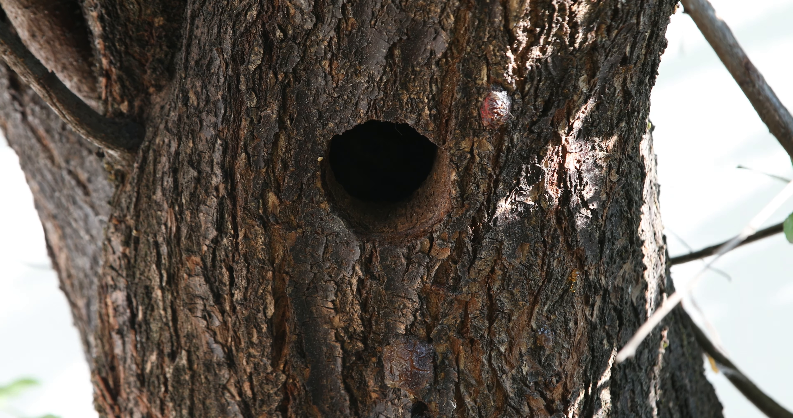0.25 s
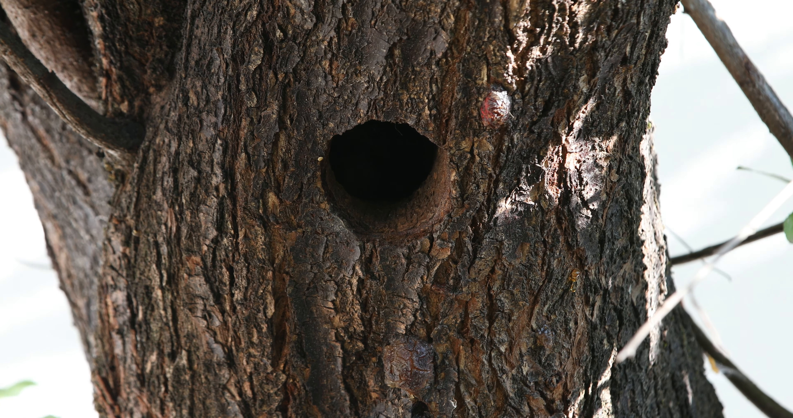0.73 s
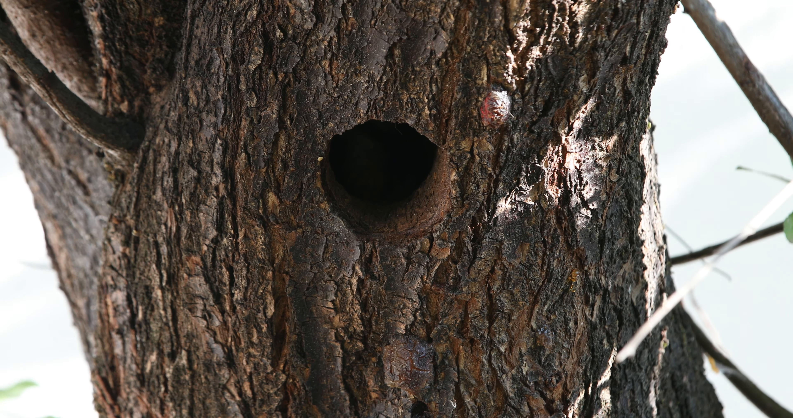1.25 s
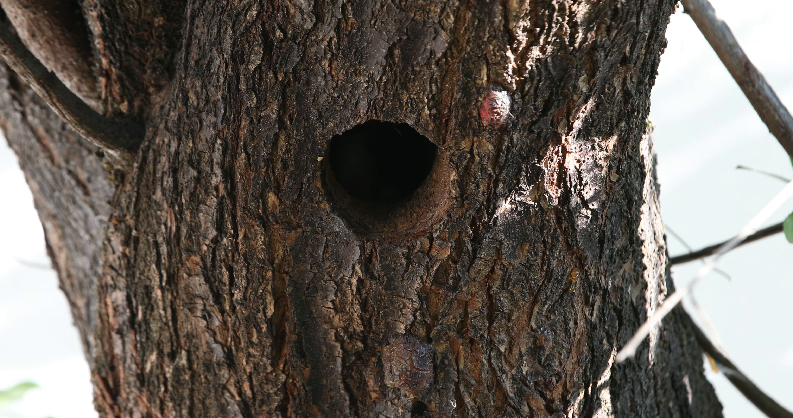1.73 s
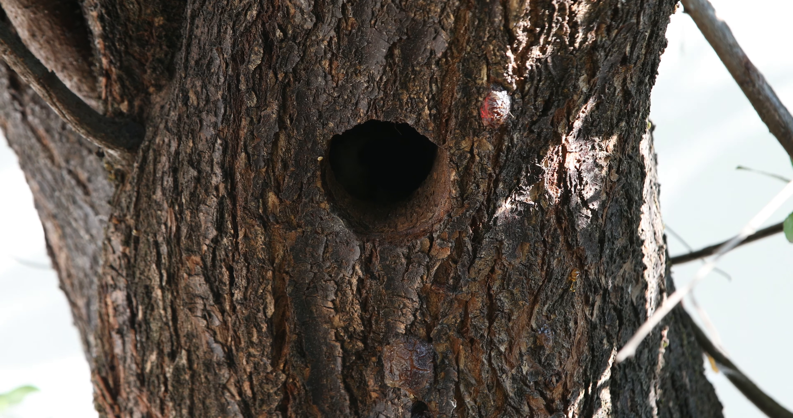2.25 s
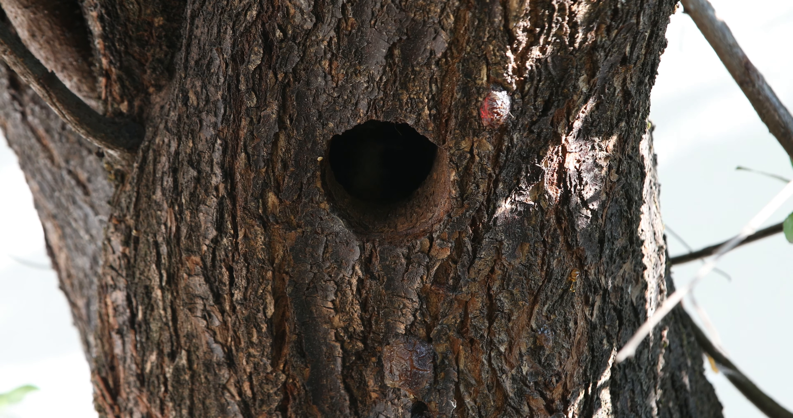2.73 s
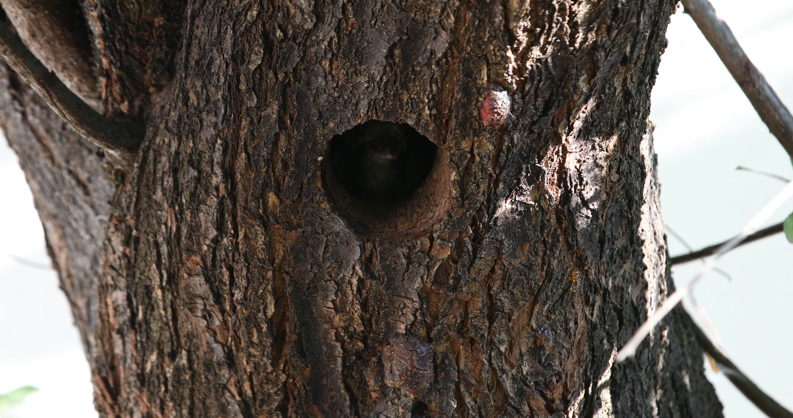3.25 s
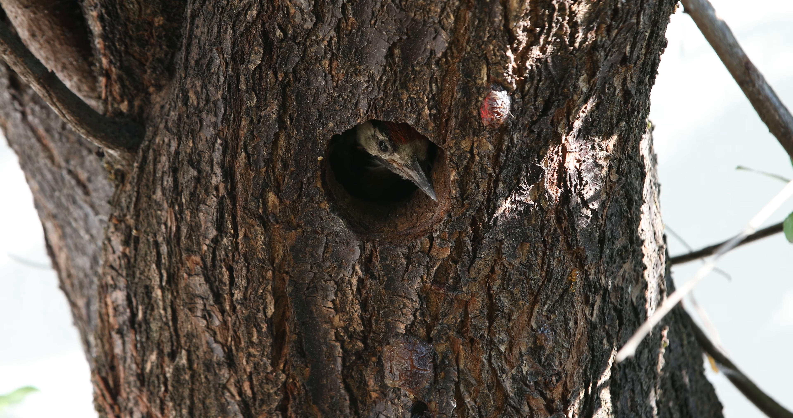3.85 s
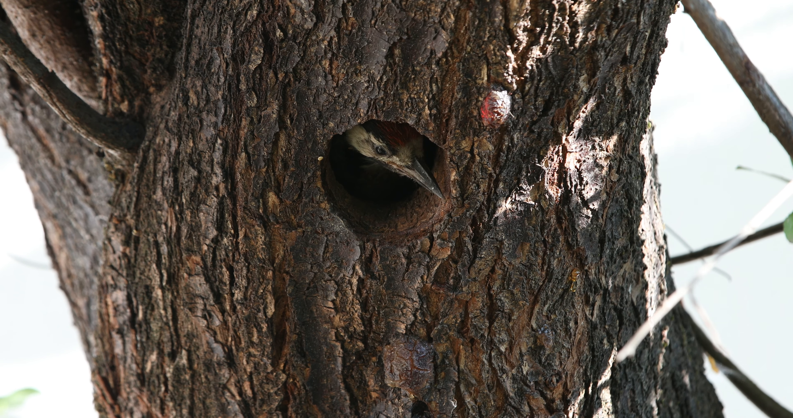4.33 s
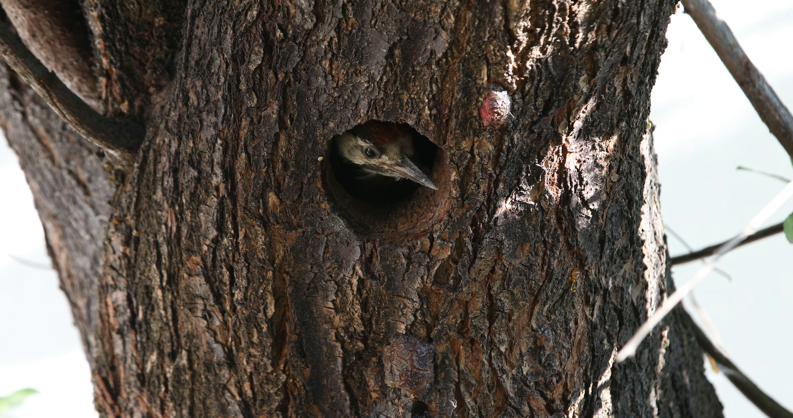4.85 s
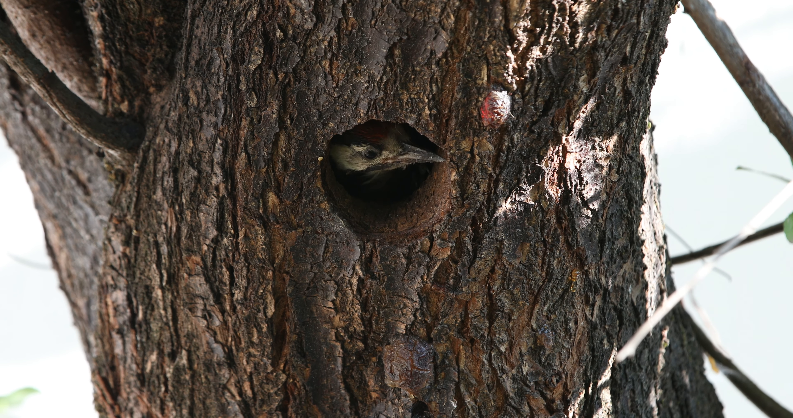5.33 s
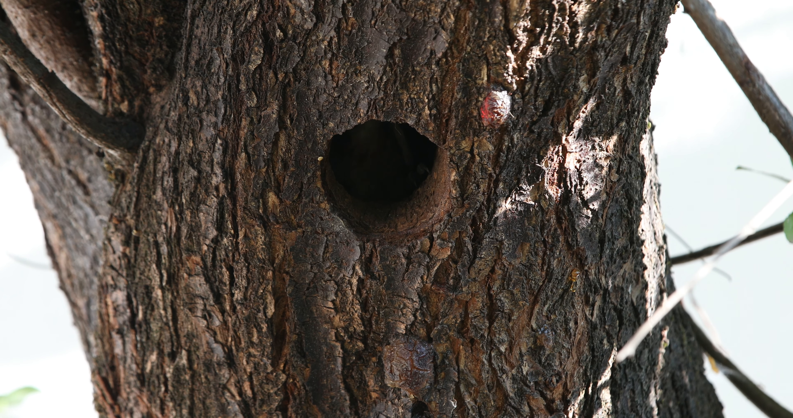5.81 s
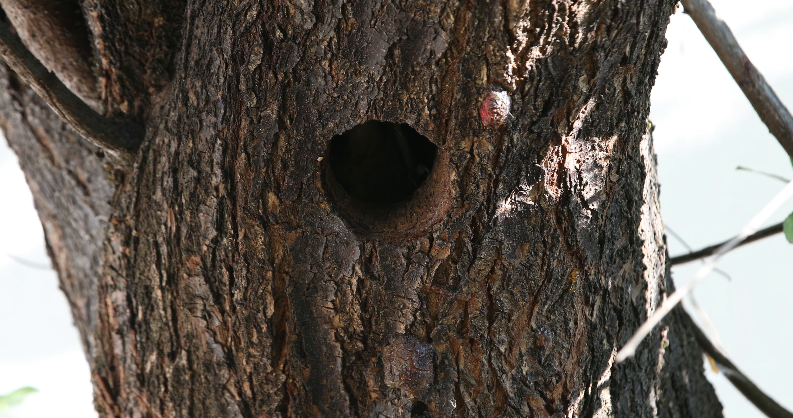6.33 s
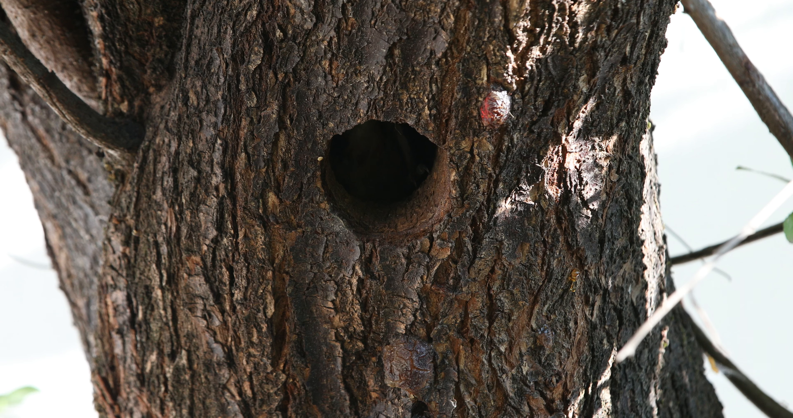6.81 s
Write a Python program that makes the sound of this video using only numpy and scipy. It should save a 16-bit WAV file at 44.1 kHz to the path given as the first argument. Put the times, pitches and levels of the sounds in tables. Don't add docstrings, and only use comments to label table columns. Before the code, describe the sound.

A young woodpecker gives three sharp harsh barks and two softer yelps over faint rapid peeps, with distant small birds, low traffic rumble and faint hiss.

```python
import sys
import numpy as np
from scipy import signal
from scipy.fft import rfft, irfft, next_fast_len
from scipy.io import wavfile
from scipy.ndimage import uniform_filter1d

SR = 44100
rng = np.random.default_rng(int(sys.argv[2]) if len(sys.argv) > 2 else 0)


def store_wav(level_fs):
    pcm = np.round(np.clip(np.atleast_2d(level_fs), -1, 1) * 32767)
    wavfile.write(sys.argv[1], SR, pcm.T.astype(np.int16))


def ratio_of_db(decibels):
    return 10 ** (np.asarray(decibels, float) / 20)


N = 312228


def shape(points, hz):
    p = np.array(points)
    db = np.interp(np.log(np.maximum(hz, 1)), np.log(p[:, 0]), p[:, 1], left=-90, right=-90)
    return ratio_of_db(db)


def walk(rate, count=N):
    hold = max(int(SR / rate), 1)
    steps = np.repeat(rng.standard_normal(count // hold + 1), hold)
    smooth = uniform_filter1d(uniform_filter1d(steps, hold), hold)
    return 1.322 * smooth[:count]


def wash(points, flicker_db, rate):
    size = next_fast_len(N, True)
    hz = np.fft.rfftfreq(size, 1 / SR)
    body = rfft(rng.standard_normal(size)) * shape(points, hz)
    place = 2 * np.log2(np.maximum(hz, 1))
    out = np.zeros(N)
    for band in range(int(2 * np.log2(points[0][0])), int(2 * np.log2(points[-1][0])) + 2):
        noise = irfft(body * np.clip(1 - abs(place - band), 0, 1), size)[:N]
        out += ratio_of_db(flicker_db * walk(rate)) * noise
    return out / np.std(out)


def add(out, stroke, tract, half=.45):
    s, hz, db, rough, fall = np.transpose(stroke)
    start = int(s[0] * SR)
    t = np.arange(start, s[-1] * SR) / SR
    hz, push, rough, fall = (np.interp(t, s, c) for c in (hz, ratio_of_db(db / 2), np.clip(rough, 0, 1), fall))
    shake = rng.standard_normal((3, SR // 4))[:, :len(t)]
    jitter = uniform_filter1d(uniform_filter1d(shake[0], size=16), size=16) * 4.9
    throb = uniform_filter1d(uniform_filter1d(shake[1], size=36), size=36) * 7.3
    hz = hz * (1 + .15 * rough * jitter)
    k = np.arange(1, 19)[:, None] / 2
    weight = np.where(k % 1 > 0, half * rough, 1)
    weight = weight * ratio_of_db(-fall * np.log2(np.maximum(k, 1))) * (k * hz < .45 * SR)
    tone = np.sum(weight * np.sin(k * 2 * np.pi * np.cumsum(hz) / SR + k * k), axis=0)
    rasp = ratio_of_db(-7 - fall) * rough * shake[2]
    flutter = ratio_of_db(5.5 * np.tanh(3 * rough) * np.tanh(throb) - rough)
    source = np.sqrt(2) * push ** 2 * (tone + rasp) * flutter
    source = np.pad(source * signal.windows.tukey(len(t), .3), 128)
    response = shape(tract, np.fft.rfftfreq(len(source), 1 / SR))
    out[start - 128:start - 128 + len(source)] += irfft(rfft(source) * response, len(source))


def play(form, s, hz, db, stretch, swell_db):
    form = np.array(form)
    after = form[:, 0] > 0
    times = s + form[:, 0] * np.where(after, stretch, 1)
    levels = db + form[:, 2] + after * swell_db
    return np.column_stack([times, hz * form[:, 1], levels, form[:, 3:]])


def voice(parts, tract, half=.45):
    out = np.zeros(N)
    for form, rows in parts:
        for row in rows:
            add(out, play(form, *row), tract, half)
    return out


def open_air(x, t60, wet_db, top_hz, gap_s, colour=None):
    t = np.arange(SR // 2 * 2) / SR
    tail = rng.standard_normal(len(t)) * ratio_of_db(-60 * t / t60) * (1 - np.exp(-t / gap_s))
    tail = signal.lfilter(*signal.butter(1, top_hz, fs=SR), tail)
    if colour:
        tail = irfft(rfft(tail) * shape(colour, np.fft.rfftfreq(len(t), 1 / SR)), len(t))
    return x + ratio_of_db(wet_db) * signal.fftconvolve(x, tail / np.sqrt(np.sum(tail ** 2)))[:N]


# t/s, shared base f/Hz, first engine's even multiples level/dB, second engine's odd
# multiples level/dB
ENGINE = [(0.0, 31.7, -68, -76), (.7, 31.2, -72, -72), (1.2, 31.07, -80, -68.5), (1.75, 31.1, -76, -68),
          (2.3, 31.18, -81, -63.5), (2.95, 31.2, -76, -64), (3.25, 31, -69, -73), (3.9, 30.7, -65.5, -71),
          (4.9, 31.12, -64, -74), (5.9, 31.52, -64.5, -65.5), (7.08, 31.5, -62.5, -77.5)]


def engine():
    s, *columns = np.transpose(ENGINE)
    hz, even_db, odd_db = (np.interp(np.arange(N) / SR, s, c) for c in columns)
    phase = 2 * np.pi * np.cumsum(hz * (1 + 0.0126 * walk(4.7))) / SR
    levels = even_db, odd_db, even_db - 5, odd_db - 10.5
    out = np.zeros(N)
    for k, db in enumerate(levels):
        out += np.sqrt(2) * ratio_of_db(db + 1.1 * walk(4.8)) * np.sin((k + 2) * phase + k)
    return out


# f/Hz, density level/dB per Hz
ROAD = [(11, -42.5), (18, -14), (30, -13), (40, -20), (52, -5), (79, -12), (120, -7), (184, -11.5),
        (298, -9), (374, -14), (527, -6.5), (693, -9), (890, -7.5), (1170, -11), (1540, -11), (4200, -37),
        (5460, -69), (9240, -120)]
# f/Hz, width/Hz, level/dB, swell with the road/(dB/dB)
DRONES = [
    (264, 27, -15.5, 1.34),
    (567, 98, -27.5, 2.1),
    (831, 70, -14.5, 0.5),
]


def road():
    nearest_s, nearest_db, rise_db_per_s = 6.01, -56, 1.28
    swell_db = -rise_db_per_s * np.maximum(nearest_s - np.arange(N) / SR, 0)
    out = ratio_of_db(nearest_db + swell_db - 0.2) * wash(ROAD, flicker_db=-1.86, rate=4.8)
    for hz, width, db, swell in DRONES:
        hum = wash([(hz - width, -12), (hz, 0), (hz + width, -12)], flicker_db=6.5, rate=1.287)
        out += ratio_of_db(nearest_db + db + swell * swell_db) * hum
    return out


# f/Hz, density level/dB per Hz
HISS = [(2650, -34), (4500, -1.5), (4840, -12.5), (7300, -10), (8670, -17), (9820, -7), (11200, -16),
        (14100, -10), (15600, -22.5)]


def hiss():
    return ratio_of_db(-85.5 - 2.5) * wash(HISS, flicker_db=2.0, rate=12)


# f/Hz, density level/dB per Hz
LEAVES = [(3000, -34), (5500, 0.5), (8500, -1.5), (10500, 2.5), (13500, -7), (16000, -24.5)]


def leaves():
    gust_s, span_s, gust_db = 0.59, 0.67, 12
    gust = np.exp(-((np.arange(N) / SR - gust_s) / span_s) ** 2)
    return ratio_of_db(-89 + gust_db * gust) * wash(LEAVES, flicker_db=3.5, rate=14)


# f/Hz, density level/dB per Hz
CHATTER = [(2200, -33.5), (3000, -6.5), (4000, -6), (4900, -6.5), (5600, -9), (6800, -9), (8000, -27.5)]
# t/s, half length/s, level/dB
BOUTS = [
    (.0, 0.43, -76),
    (0.664, 0.13, -67.5),
    (1.018, 0.11, -68),
    (1.384, 0.12, -72),
    (1.904, 0.11, -72.5),
    (2.658, 0.096, -81),
    (3.493, 0.5, -85.5),
    (4.6, 0.2, -73.5),
    (5.65, 0.16, -78.5),
    (6.3, 0.23, -80),
]


def chatter():
    out, t = np.zeros(N), np.arange(N) / SR
    for when, pitch, size, long in rng.random((160, 4)):
        s = 0.0056 + when * (N / SR - .1)
        hz = 3300 + 2400 * pitch ** 1.5
        span = 0.033 + 0.049 * long
        chirp = [(s, hz * 1.3, -24, .15, 20), (s + span / 2, hz, -12 * size, .15, 20),
                 (s + span, hz * 0.64, -16, .1, 20)]
        add(out, chirp, CHATTER)
    out = open_air(out, t60=0.46, wet_db=14.5, top_hz=6050, gap_s=0.0091)
    flock = ratio_of_db(-1.5) * out / np.std(out) + ratio_of_db(-6) * wash(CHATTER, flicker_db=2.5, rate=14)
    level = ratio_of_db(-93.5) + sum(ratio_of_db(db) * np.exp(-((t - s) / span) ** 2) for s, span, db in BOUTS)
    return ratio_of_db(-3.5) * level * flock


# f/Hz, level/dB
DEEP = [(1400, -14), (2200, -8), (3300, -0.5), (4500, -1), (5400, -16), (6600, -20), (7700, -7),
        (9000, -9.5), (10200, 3), (12000, -14), (15500, -23)]
MUFFLED = [(1400, -10), (2300, -0.5), (3300, -8), (4500, -20), (6500, -17), (7700, -6), (8800, -14),
           (10000, 1.5), (12000, -23), (15500, -22)]
# t/s, pitch ratio, level/dB, roughness (0-1), overtone fall/(dB/octave)
THIN = [(-.04, .62, -18, .3, 14), (-.02, .9, -5, .3, 14), (0, 1, 0, .3, 14), (.016, .9, -12, .3, 14)]
PIP = [(-.012, .93, -18, .04, 14), (0, 1, 0, .03, 14), (.016, .96, -20, .06, 14)]
WHEEZE = [(-.024, 1.05, -26, .7, -6), (-.014, 1.04, -8, .4, -3), (0, 1, 0, .27, -2),
          (.01, .97, -4, .28, -1), (.026, .95, -22, .7, -3)]
# t/s of first peak, f/Hz, level/dB, stretch ratio afterwards, swell afterwards/dB
THINS = [
    (0.069, 7800, -69, 1, 0),
    (.048, 5200, -74, .3, 0),
    (0.54, 5600, -65, 1.6, 0),
    (0.64, 6560, -70, 1.4, 0),
    (1.175, 4940, -76, 0.95, 0),
]
PIPS = [
    (.268, 7500, -54.5, 0.9, 0),
    (1.19, 5100, -64, 1.2, 0),
    (1.9, 3280, -70, 0.98, 0),
    (2.667, 3300, -74, 0.74, 0),
    (5.832, 3800, -55.5, .4, 0),
    (3.7, 3710, -52, .6, 0),
    (5.66, 4130, -72.5, 1.5, 0.0021),
]
WHEEZES = [
    (0.104, 2250, -59.5, 1.15, 1),
    (4.59, 2433, -75, 2.2, -5.5),
]
GRUNTS = [
    (0.309, 2210, -59.5, 0.72, 0.0045),
    (.533, 2460, -69.5, 0.65, 0),
]


def murmurs():
    out = voice([(THIN, THINS), (PIP, PIPS)], DEEP)
    out += voice([(WHEEZE, WHEEZES)], DEEP, half=1.4)
    return out + voice([(WHEEZE, GRUNTS)], MUFFLED, half=1.4)


# f/Hz, level/dB
HOLE = [(2500, -3), (3300, -10.5), (5000, -5.5), (6200, -10), (7500, 1), (8800, -10), (11000, 0.5),
        (13000, -11), (15500, -33)]
# t/s, f/Hz, level/dB, roughness (0-1), overtone fall/(dB/octave)
RISE = [(-.07, 3600, -20, .3, 9), (-.052, 4400, 1, .25, 14), (-.036, 5200, -1, .3, 14),
        (-.026, 5700, -20, .2, 9)]
HOLD = [(-.032, 7060, -29, .02, 14), (-.022, 7310, -2, .08, 14), (-.013, 7280, -8, .1, 14),
        (-.005, 7450, -23.5, .05, 14)]
DROP = [(-.01, 4930, -12.5, .45, -7), (-.004, 4620, -4, .42, -2), (.006, 4000, -3, .4, -1),
        (.019, 3400, 3, .26, 9), (.03, 2950, -5, .25, 9)]
# t/s of drop, drop level/dB, rise under it/dB, hold under it/dB, extra overtone fall/(dB/octave)
PEEPS = [(0.5317, -55, -11, -25, 12), (0.7166, -57, -4, -16, 3.5), (1.043, -63.5, 2, -6, -1),
         (1.1987, -71, -8, -14, 0), (1.4193, -63.5, -5, -22, -0.5), (1.6011, -59, -9, -12, 0.5),
         (1.7853, -61.5, -3, -22, 0), (1.985, -60, -12, -8, 2), (2.1973, -60, -12, -1.5, -1),
         (2.379, -58, -12, -3.5, 3), (2.5643, -60.5, -8, -2, 3.5), (2.775, -63.5, -7, -4, 6),
         (2.992, -62.5, -7.5, -4, 5), (3.6087, -60, -3, -11, 2.5), (3.7694, -63.5, -8, -16, 2.5),
         (3.976, -58.5, -4.5, -7, 3), (4.1697, -56.5, -7, -17, 4.5), (4.354, -64.5, -3, -22, 7),
         (4.527, -59.5, -18, -24, 11), (4.9576, -66.5, -9, -20, 1), (5.1412, -66, -8, -7, 1),
         (5.3268, -65.5, -11, -4, 1), (6.5994, -67.5, -12.5, -12, 7), (6.7937, -74, -10, -12.5, -1)]


def peeps():
    out = np.zeros(N)
    for s, drop_db, rise_db, hold_db, fall in PEEPS:
        for part, db in ((RISE, rise_db), (HOLD, hold_db), (DROP, 0)):
            scaled = np.array(part) * [1, 1.01, 0.8, 1.4, 0.99]
            add(out, scaled + [s, 0, drop_db + db - 6.0, 0, fall], HOLE)
    return out


def hollow(x):
    round_trip_s, back = .00406, 0.42
    loop = np.zeros(int(round_trip_s * SR) + 2)
    loop[0] = 1
    loop[-3:] = -back * np.array([1, 2, 1]) / 4
    return signal.lfilter([np.sqrt(1 - back ** 2)], loop, x)


# f/Hz, level/dB
THROAT = [(750, -13.5), (1000, -8), (1800, -3.5), (2700, 0), (3600, -0.5), (4400, -0.5), (5200, -15.5),
          (5650, -9), (6150, -18), (6900, -2.5), (7500, -3), (8300, -10), (9000, -4.5), (10200, -4.5),
          (11300, -2.5), (12300, -9), (15000, -21.5), (15750, -28.5)]
# t/s, pitch ratio, level/dB, roughness (0-1), overtone fall/(dB/octave)
LOW = [(-.022, .6, -30, .8, 2), (-.012, .72, -12, .7, 2), (-.004, .9, -8, .5, 2), (0, .99, -1, .22, 2),
       (.006, 1.015, -4, .16, 1), (.011, 1.1, -10, .3, 4), (.016, 1.25, -24, .25, 6)]
DRAWL = [(-.024, .55, -32, .7, 3), (-.014, .6, -15, .6, 3), (-.006, .68, -18, .85, 3),
         (-.002, .97, -10, .3, 3), (.002, 1, -2, .14, 3), (.008, 1.01, 0, .12, 4.5),
         (.013, 1.02, -6, .18, 6), (.02, 1.02, -22, .25, 6)]
HIGH = [(-.03, .7, -46, 1, 14), (-.016, .76, -36, .9, 8), (-.011, .76, -19, .8, 4),
        (-.006, .86, -10, .55, 4), (0, 1, 0, .3, 6), (.004, 1.06, -2, .55, 6), (.009, 1.18, -3, .6, 6),
        (.013, 1.26, -7, .5, 6), (.018, 1.24, -24, .5, 5)]
CLOSE = [(-.006, .95, -17, .07, 8), (0, 1, 0, .04, 7.5), (.0045, .96, -20, .12, 5), (.011, .92, -1, .02, 9),
         (.0165, .92, -9, .12, 9), (.019, .93, -13, .6, 11), (.025, .94, -6, .7, 12),
         (.032, .96, -22, .4, 12)]
SLUR = [(-.014, 1.07, -18, .3, 9), (-.008, 1.05, -5, .25, 9), (0, 1, 0, .05, 8), (.005, .98, -14, .3, 7),
        (.01, .89, -2, .25, 8), (.015, .89, -3, .45, 8), (.024, .95, -20, .7, 8)]
SAG = [(-.01, 1.15, -16, .5, 3), (0, 1, 0, .6, 3), (.008, .88, -2, .7, 3), (.016, .74, -16, .7, 3)]
# t/s of first peak, f/Hz, level/dB, stretch ratio afterwards, swell afterwards/dB
LOWS = [
    (3.080, 2260, -31, 1.3, -4),
    (4.793, 2247, -30.5, 1.2, 2.5),
]
DRAWLS = [
    (5.853, 2439, -26.5, 1, 0),
]
HIGHS = [
    (3.076, 3634, -28, 0.79, 0),
    (4.786, 3508, -26, 1.15, -0.91),
    (5.843, 3582, -27.5, 1.25, 0.25),
]
CLOSES = [
    (3.0929, 3057, -24, 0.99, -1.8),
    (4.806, 3052, -24, 0.91, -0.37),
]
SLURS = [
    (5.872, 2792, -28.5, 0.94, -1.1),
]
SAGS = [
    (1.096, 4700, -59, 0.61, 0),
    (3.109, 1588, -45.5, 1.1, 0),
    (4.824, 1355, -48, 1.1, 0.00066),
    (5.880, 1607, -45, 0.88, 0.002),
]


def barks():
    onsets = voice([(LOW, LOWS), (HIGH, HIGHS)], THROAT)
    rest = voice([(DRAWL, DRAWLS), (CLOSE, CLOSES), (SLUR, SLURS), (SAG, SAGS)], THROAT)
    return hollow(onsets) + rest


# f/Hz, level/dB
GAPE = [(1000, -1.5), (2300, -2), (3300, 2.5), (4300, -4), (5200, -6), (6300, 2), (7800, -6.5),
        (10300, -6.5), (12500, -13), (15500, -22)]
# t/s, pitch ratio, level/dB, roughness (0-1), overtone fall/(dB/octave)
CHOKE = [(-.012, .9, -24, .8, 2), (-.006, .97, -12, .6, 2), (-.002, 1, -1, .08, 5), (.007, 1, -1, .08, 5),
         (.011, .95, -14, .2, 6), (.015, .9, -2, .05, 12), (.021, .89, -5, .2, 12), (.027, .88, -7, .8, 12),
         (.042, .92, -20, .8, 12)]
OPEN = [(-.05, .9, -44, 1, 12), (-.03, 1, -28, 1, 5), (-.008, 1.02, -13, .7, 1), (-.003, 1.02, -5, .3, 8),
        (0, 1, 0, .14, 11), (.008, .98, -8, .16, 8), (.012, .96, -22, .2, 5)]
SHUT = [(-.007, .98, -17, .15, -1), (0, 1, 0, .08, 1), (.008, .97, -5, .16, 1.5), (.016, .95, -14, .6, 3),
        (.022, 1, -9, 1, 5), (.045, .97, -26, .9, 6)]
ARCH = [(-.055, .78, -24, .5, 12), (-.04, .97, -12, .55, 12), (-.018, 1.02, -8, .5, 10),
        (-.011, 1.03, -24, .3, 10), (0, 1, 0, .25, 12), (.01, .96, -3, .6, 12), (.022, 1.01, -14, .4, 12),
        (.036, 1.01, -24, .3, 12)]
# t/s of first peak, f/Hz, level/dB, stretch ratio afterwards, swell afterwards/dB
CHOKES = [
    (1.107, 3077, -50.5, 1, 0),
]
OPENS = [
    (3.505, 2420, -40.5, 0.92, 0),
    (3.706, 2225, -38.5, 1, 0),
]
SHUTS = [
    (3.511, 2108, -45.5, 1, -1),
    (3.714, 2253, -45, 0.84, -0.41),
]
ARCHES = [
    (3.722, 4330, -46, 0.97, 0),
    (3.537, 3200, -56.5, 0.64, -2),
]


def yelps():
    out = voice([(CHOKE, CHOKES), (OPEN, OPENS), (SHUT, SHUTS), (ARCH, ARCHES)], GAPE)
    rim_hz, rim_t60_s, rim_db = 6180, 0.24, -11.5 + 12
    quality = rim_hz * rim_t60_s * np.pi / np.log(1000)
    rim = signal.lfilter(*signal.iirpeak(rim_hz, quality, fs=SR), out)
    return out + ratio_of_db(rim_db) * rim


# f/Hz, level/dB
ECHOES = [(500, -6), (2300, -5), (2900, -1), (3400, -4), (4000, 0), (5400, -6), (7000, 0), (16000, 0)]


def nestling():
    calls = murmurs() + peeps() + barks() + yelps()
    near = open_air(calls, t60=.14, wet_db=-17, top_hz=15000, gap_s=.005)
    return open_air(near, t60=0.36, wet_db=-24.5, top_hz=4500, gap_s=.012, colour=ECHOES)


# t/s, f/Hz, level/dB
WHISTLE = [
    (1.2865, 1360, -110),
    (1.321, 1360, -75),
    (1.328, 1370, -56),
    (1.37, 1410, -52),
    (1.402, 1535, -53),
    (1.435, 1540, -70),
    (1.474, 1550, -55),
    (1.5, 1550, -55),
    (1.535, 1540, -57),
]


def far_bird():
    out = np.zeros(N)
    add(out, [(*row, .02, 40) for row in WHISTLE], [(500, 0), (9000, 0)])
    t = np.maximum(np.arange(N) / SR - WHISTLE[0][0], 0)
    beat_t = t - np.clip(t - .088, 0, .0065)
    warble = 1 - 1.35 * np.exp(-t / 0.14) * np.cos(2 * np.pi * 56 * beat_t)
    return open_air(out * warble, t60=.95, wet_db=-12, top_hz=4000, gap_s=.03)


def scene():
    air = engine() + road() + hiss() + leaves() + chatter()
    return (air + nestling() + far_bird())[None]


def band_limit(x):
    return signal.sosfilt(signal.butter(12, 15820, fs=SR, output="sos"), x)


def record(dry):
    return band_limit(dry)


dry = scene()
out = record(dry)
store_wav(out)
```